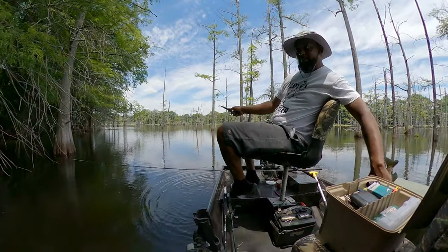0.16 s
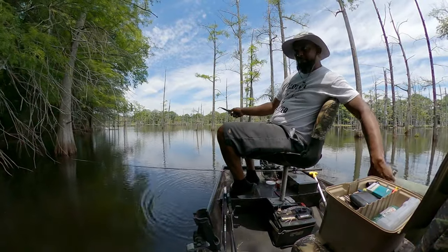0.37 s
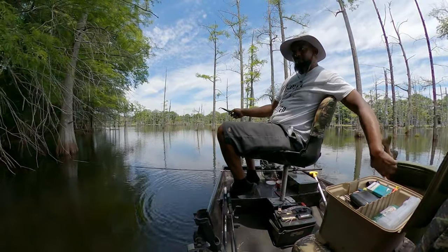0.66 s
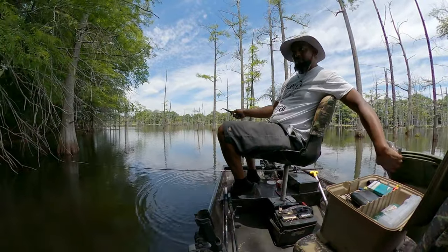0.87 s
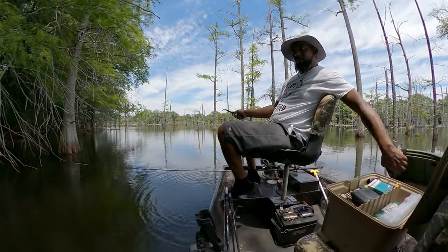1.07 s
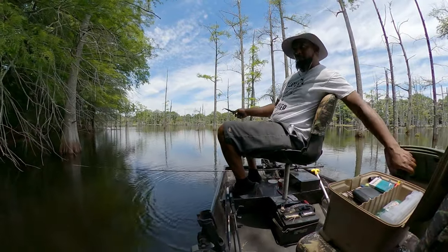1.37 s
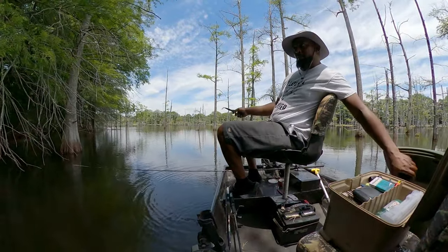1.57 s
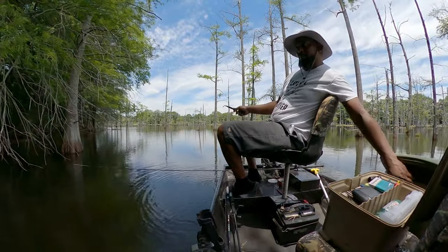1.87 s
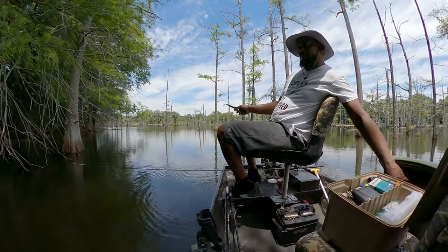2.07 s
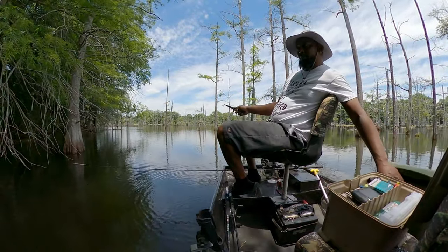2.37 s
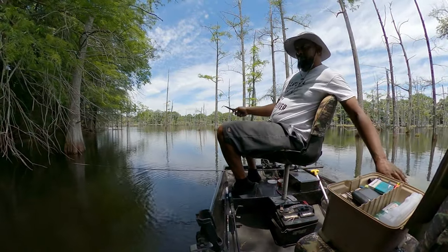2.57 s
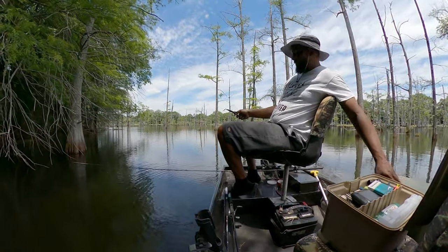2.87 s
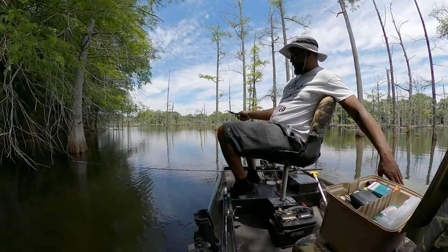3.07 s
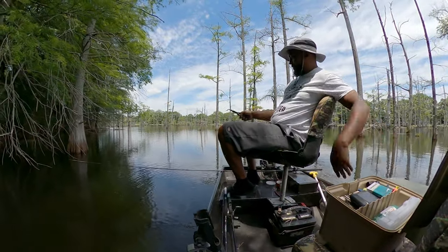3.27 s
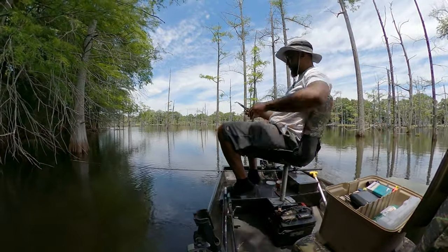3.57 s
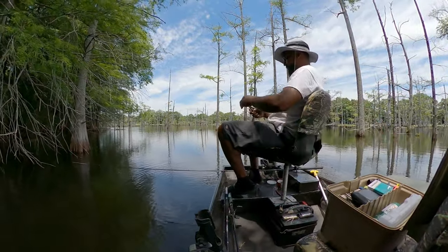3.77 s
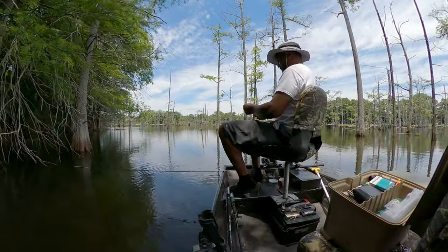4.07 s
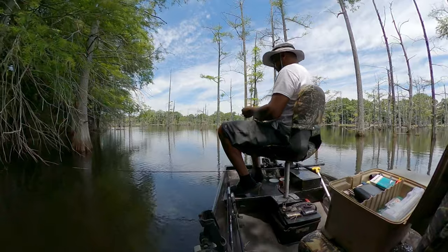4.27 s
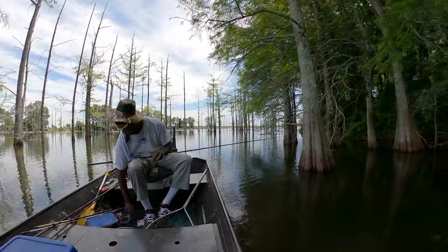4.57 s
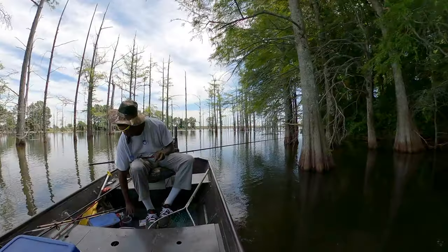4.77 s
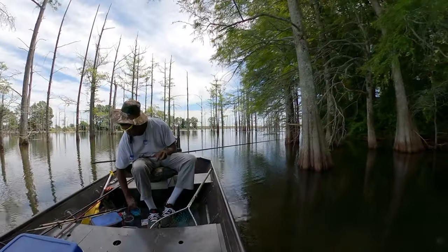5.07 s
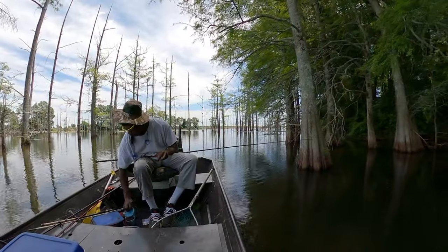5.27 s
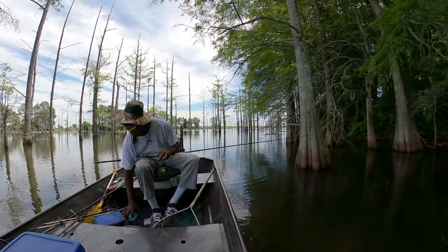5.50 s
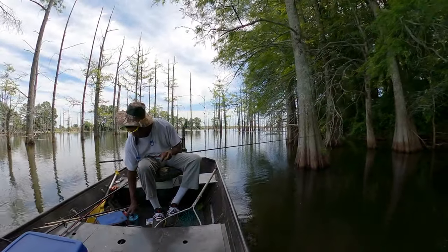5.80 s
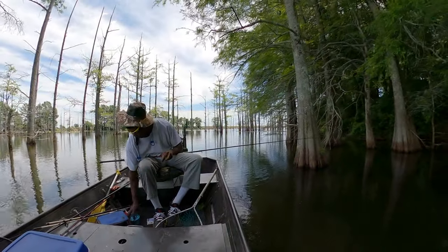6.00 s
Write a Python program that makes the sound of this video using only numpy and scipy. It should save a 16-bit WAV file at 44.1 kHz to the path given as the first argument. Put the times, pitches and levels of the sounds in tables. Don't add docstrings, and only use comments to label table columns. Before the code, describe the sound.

A hull-mounted microphone catches close handling in a small aluminum boat on a still swamp lake. From 0 to 1 s, wind rumble, low hull knocks, light plastic ticks and rustling cloth mix with brief bird whistles and chirps. At about 1.07 and 1.14 s, plastic cracks violently, the second slam overloading and echoing from the trees. A sharp snap follows at 1.6 s, then a hull knock near 2.1 s. From 2.2 to 2.6 s a lid drags and rattles roughly; the box is set down at 2.45 s and drops with a deep boom at 2.65 s. Sparse snaps, cloth and birds continue, with a harder click at 3.4 s. From 4.1 s it fades in steps, cutting at 4.5 s to steady insect hiss and wind puffs. Dull taps come at 5 s, tackle bounces on metal at 5.4 s, a thin swish follows, then fumbling and a final thump.

```python
import sys
import numpy as np
from scipy import signal
from scipy.fft import rfft, irfft
from scipy.io import wavfile
from scipy.ndimage import uniform_filter1d

SR = 44100
rng = np.random.default_rng(int(sys.argv[2]) if len(sys.argv) > 2 else 0)


def pcm_store(signal):
    levels = np.round(np.clip(np.atleast_2d(signal), -1, 1) * 32767)
    wavfile.write(sys.argv[1], SR, levels.astype(np.int16).T)


def elevation(decibels):
    levels = np.asarray(decibels, float)
    return 10 ** (levels / 20)


N = 270774
T = np.arange(N) / SR
FADE_START_S, CUT_S, STEP_S = 4.1043, 4.4713, 1 / 29.97


def colour(x, points):
    hz, db = np.transpose(points)
    f = np.maximum(np.fft.rfftfreq(len(x), 1 / SR), 1)
    return irfft(rfft(x) * elevation(np.interp(np.log(f), np.log(hz), db)), len(x))


def unit(x):
    return x / np.sqrt(np.mean(x ** 2))


def band(x, lo_hz, hi_hz):
    return signal.sosfilt(signal.butter(3, [lo_hz, hi_hz], "band", fs=SR, output="sos"), x)


def split(x, hz):
    low = signal.sosfiltfilt(signal.butter(2, hz, fs=SR, output="sos"), x)
    return low, x - low


def walk(rate_hz):
    k = int(SR / rate_hz)
    steps = np.repeat(rng.standard_normal(N // k + 1), k)
    return unit(uniform_filter1d(steps, k)[:N])


def even(x, size):
    return x / np.sqrt(uniform_filter1d(x ** 2, size))


def add(out, s, x):
    i = int(s * SR)
    out[i:i + len(x)] += x[:N - i]


def decay(t, t60_s):
    return np.exp(-np.log(1000) * t / t60_s)


def rings(hz, db, t60_s, phase, size):
    t = np.arange(size)[:, None] / SR
    return (elevation(db) * decay(t, t60_s) * np.sin(2 * np.pi * (hz * t + phase))).sum(axis=1)


def crack(noise, points, t60_s):
    contact_s = 0.0008
    t = np.arange(len(noise)) / SR
    low, high = split(colour(noise, points), 1800)
    front = (1 + 0.57 * np.exp(-t / 0.0022)) * (1 - np.exp(-t / contact_s))
    return 0.7 * front * (low * decay(t, 1.35 * t60_s) + high * decay(t, 0.84 * t60_s))


def plastic_hit(out, s, db, hz, weight_db, edge_db, t60_s):
    size = 4096
    low_db, high_db = db + weight_db, db + edge_db
    points = [(150, low_db - 9), (400, low_db + 6), (900, low_db), (1300, db + 9), (2700, db - 3),
              (5000, high_db), (7200, high_db - 7), (9000, high_db - 19), (15000, high_db - 57), (17000, -110)]
    add(out, s, crack(rng.standard_normal(size), points, t60_s))
    ring_db = db if hz < 3300 else high_db
    add(out, s, rings(np.array([hz]), ring_db - 11, 0.6 * t60_s, 0, size))
    place, loss, phase = rng.random((3, 5))
    add(out, s, rings(2200 * 3.3 ** place, high_db - 12 - 8 * loss, 0.71 * t60_s, phase, size))


# (time [s], peak [dB], ring [Hz], lows over ring [dB], highs over ring [dB])
LATCH_SNAPS = [(0.0579, -21, 1810, 5.5, 3.5), (0.203, -19, 1920, -28, 0.5), (0.5588, -16.5, 2320, -27, -21),
               (1.0497, -14, 1500, 6, -5), (1.069, 1, 1240, 1, -6.5), (1.0997, -13, 1190, 12, -2),
               (1.1094, -14, 1260, -2, -2.5), (1.1343, -13, 1080, -5, -0.5), (1.141, 9, 1295, -3.5, -0.5),
               (1.575, -2, 1470, -23, -13.5), (1.6093, -23.5, 5580, -32, 20),
               (1.9563, -14.5, 1490, -7, -9.5), (2.0008, -27.5, 5360, 2, 5.5),
               (2.0352, -16.5, 1560, -8, -5.5), (2.4289, -8.5, 2800, 3, 5), (2.556, -12, 1890, -35, -3.5),
               (2.6537, 2, 1570, -5, -6), (3.1914, -17, 1080, 4, -6), (3.4205, -4, 1610, -0.5, -11.5),
               (3.55, -23, 2060, 4, 0), (3.7974, -12, 1230, -9, -13.5), (4.161, -12, 1390, -8, -8),
               (4.687, -19, 1500, 2, -3.5), (5.387, -16.5, 1150, -12, 1.5)]


def snaps():
    ring_s, edge_db_to_double = 0.061, 14
    out = np.zeros(N)
    for s, db, hz, weight_db, edge_db in LATCH_SNAPS:
        t60_s = ring_s * 2 ** (min(edge_db, 2) / edge_db_to_double)
        plastic_hit(out, s, db, hz, weight_db, edge_db, t60_s)
    return out


# (time [s], peak [dB], lows over ring [dB])
BOX_BUMPS = [(0.2924, -25.5, 15.5), (0.3178, -18.5, 6), (0.3798, -36, 22), (0.9729, -22, 8.5),
             (2.0886, -8, 9), (2.2595, -0.5, 6), (2.2879, -2, -3), (2.489, -18, -13), (2.658, -20.5, 26),
             (2.792, -24, 9), (3.228, -23, 5.5), (3.3718, -17.5, 8.5), (3.496, -28, 13.5),
             (5.438, -25.5, -13), (5.468, -30, 16)]


def bumps():
    out = np.zeros(N)
    for s, db, weight_db in BOX_BUMPS:
        plastic_hit(out, s, db, 1230, weight_db, edge_db=-13, t60_s=0.056)
    return out


# (time [s], peak [dB], centre [Hz])
BRIGHT_TICKS = [(0.041, -21, 5344), (0.103, -25, 5540), (0.192, -16, 5400), (0.418, -23, 5140),
                (0.8036, -34, 5810), (0.8932, -24, 6740), (0.96, -22.5, 5900), (1.477, -29.5, 6760),
                (1.63, -19, 5600), (1.853, -24.5, 6140), (1.8813, -24, 5670), (1.928, -26.5, 5670),
                (3.121, -27.5, 4800), (3.3553, -28, 6560), (4.133, -24.5, 6900), (0.293, -24, 6250),
                (1.547, -29, 4550), (1.355, -36, 6960), (3.832, -27, 4940), (2.676, -34, 7050),
                (2.724, -34, 7050), (5.466, -23, 5400), (0.104, -31, 7300)]
# (time [s], peak [dB], centre [Hz])
DULL_TAPS = [(0.937, -18, 1600), (2.049, -27, 450), (2.848, -21, 1740), (3.324, -22, 1900),
             (3.35, -22, 1400), (4.01, -20.5, 1370), (5, -15, 360), (5.043, -17.5, 350), (5.08, -20.5, 440),
             (5.534, -15, 550), (5.595, -18, 710), (5.743, -31, 1370), (5.764, -22, 1300), (5.78, -26, 700),
             (5.795, -27, 1500), (5.856, -20, 1250), (5.862, -16.5, 1400), (5.857, -23.5, 3700),
             (5.883, -18, 520), (5.902, -29, 1000), (5.967, -30, 1260), (6.011, -25, 500),
             (4.034, -28, 1440), (4.047, -28, 1150), (3.405, -32, 3000), (3.46, -20, 2100),
             (1.735, -30, 1340), (0.975, -3, 550), (2.05, -33, 2100), (1.975, -18, 1600),
             (4.128, -26, 2200), (0.297, -11, 1400), (0.29, -17, 1300), (0.38, -22, 970), (4.9, -26, 2000),
             (5.466, -34, 1250), (5.555, -25, 870), (5.512, -32, 1400), (5.984, -18.5, 1204),
             (6.037, -7.5, 360)]


def ticks():
    out = np.zeros(N)
    for s, db, hz in BRIGHT_TICKS + DULL_TAPS:
        points = [(hz / 4, db - 17), (hz / 1.226, db), (hz, db + 9.5),
                  (1.24 * hz, db - 7), (2.27 * hz, db - 35.5), (22000, -110)]
        add(out, s, crack(rng.standard_normal(2048), points, 0.048))
    return out


# (centre [Hz], width [Hz], level [dB])
SLAM_BANDS = [(1080, 25, -4), (1450, 120, -5.5), (1984, 41, -10), (2170, 110, -4), (2415, 58, -5),
              (2740, 50, -5), (2970, 23, -12), (3670, 54, -2.5), (4130, 58, -13), (4670, 32, -19),
              (4950, 130, 1), (6860, 31, -18)]
# (frequency [Hz], level [dB], t60 [s])
BOX_MODES = [(1093, -6, 0.25), (1380, -3, 0.038), (1927, -20, 1.1), (2140, -6, 0.048), (2290, 0, 0.042),
             (2848, -0.5, 0.057), (3260, -5, 0.063), (3970, -3, 0.099), (4160, -1, 0.1), (5400, -15, 0.11),
             (6100, -23, 0.23), (7300, -15, 0.024)]


def slam_echo():
    start_s, level_db, t60_s, widen = 1.142, -21, 0.58, 0.96
    wash_gain, ring_db = 0.97, -11.5
    size = SR // 2
    noise = rng.standard_normal(size)
    body = np.zeros(size)
    for hz, width_hz, db in SLAM_BANDS:
        reach_hz = widen * max(width_hz, 70)
        body += elevation(db) * unit(band(noise, hz - reach_hz, hz + reach_hz))
    wash = unit(band(band(noise, 410, 6100), 300, 7000))
    tail = (unit(body) + wash_gain * wash) * decay(np.arange(size) / SR, t60_s)
    hz, db, mode_t60_s = np.transpose(BOX_MODES)
    ring = rings(hz, db + ring_db, np.minimum(mode_t60_s, 0.12), rng.random(len(hz)), size)
    out = np.zeros(N)
    add(out, start_s, elevation(level_db) * tail + ring)
    return out


# (frequency [Hz], density [dB per Hz])
FRICTION_COLOUR = [(80, -11), (200, 0.5), (300, 0.5), (420, -2), (756, -5), (952, -13), (1140, -3),
                   (1370, -12), (1900, -10.5), (2360, -13.5), (5560, -25.5), (7120, -28.5), (15500, -68.5)]


def slips():
    spikes_db = rng.exponential(size=N // 40 + 1).repeat(40)[:N]
    grains = elevation(1.8 * walk(45) + 2.2 * walk(140) + 1.8 * spikes_db)
    return colour(rng.standard_normal(N) * grains, FRICTION_COLOUR)


# (time [s], length [s], level [dB], brightness [dB], place of peak [0-1])
STROKES = [(0.28, 0.15, -27, -16, 0.12), (0.337, 0.094, -34, -24, 0.6), (1.04, 0.19, -25.5, -12.5, 0),
           (1.969, 0.11, -37, -11.5, 0.12), (2.209, 0.53, -33, -3, 0.11), (2.205, 0.089, -9.5, -6, 0.45),
           (2.287, 0.044, -20.5, -9.5, 0.16), (2.306, 0.052, -14, -9.5, 0.3), (2.348, 0.091, -24, -2, 0.65),
           (2.42, 0.041, -18, -8, 0.72), (2.44, 0.14, -29.5, -0.5, 0.29), (2.549, 0.053, -26.5, -3.5, 0.36),
           (2.589, 0.1, -32, 1, 0.4), (3.358, 0.068, -28, -16, 0.8), (3.415, .07, -33, 3, 0),
           (3.48, 0.28, -34.5, -9, 0), (5.392, 0.14, -38.5, 0, 0), (5.501, 0.13, -36.5, -6, 0.24),
           (5.748, 0.092, -43.5, -3, 0.4), (5.816, 0.16, -38.5, -20, 0.33), (5.934, 0.17, -39, -22, 0.46)]


def scrape():
    dull, bright = (unit(signal.sosfiltfilt(signal.butter(2, 3300, kind, fs=SR, output="sos"), slips()))
                    for kind in ("low", "high"))
    dull_gain, bright_gain = np.zeros(N), np.zeros(N)
    for s, length_s, db, bright_db, peak in STROKES:
        u = np.linspace(0, 1, int(length_s * SR))
        stroke = np.interp(u, [0, np.clip(peak, 0.02, 0.98), 1], [0, 1, 0]) ** 0.75
        add(dull_gain, s, elevation(db) * stroke)
        add(bright_gain, s, elevation(db + bright_db) * stroke)
    thud, middle = split(dull, 900)
    dull = thud + np.roll(middle, N // 2)
    return dull * dull_gain + bright * bright_gain


# (time [s], peak [dB], ring [Hz])
LID_CATCHES = [(2.2063, -43, 1140), (2.2168, -18, 3280), (2.2227, -3, 1900), (2.237, -8, 2400),
               (2.251, -16, 1500), (2.314, -3, 1740), (2.3355, -2.5, 1870), (2.337, -12, 3620),
               (2.379, -21, 7000), (2.3869, -11, 1860), (2.394, -10, 2000), (2.398, -17, 4000),
               (2.4333, -11, 4570), (2.44, -10, 560), (2.4857, -13, 1740), (2.49, -20, 600),
               (2.662, -16, 580), (2.506, -27, 3420), (2.573, -12, 2000), (2.6064, -24, 4090),
               (2.621, -20, 5500)]


def catches():
    out = np.zeros(N)
    for s, db, hz in LID_CATCHES:
        points = [(hz / 4, db - 28), (hz / 1.08, db - 1), (hz, db + 12), (1.2 * hz, db),
                  (7400, db - 9), (15000, db - 49), (22000, -110)]
        add(out, s, crack(rng.standard_normal(2048), points, 0.045))
    return out


# (time [s], peak [dB], ring [Hz], t60 [s])
BOX_DROPS = [
    (2.4449, 0, 222.2, 0.15),
    (2.655, -1.5, 172.5, 0.33),
    (2.6574, -8.5, 281, 0.17),
]


def drops():
    out = np.zeros(N)
    rise_s = 0.0035
    rise = np.clip(np.arange(16000) / SR / rise_s, 0, 1)
    for s, db, hz, t60_s in BOX_DROPS:
        add(out, s, rise * rings(np.array([hz]), db, t60_s, 0, len(rise)))
    return out


# (frequency [Hz], level [dB], t60 [s])
TRAY_MODES = [(497, -8.5, 0.37), (566, -3, 0.11), (792, -8, 0.17), (1150, -10, 0.087), (1720, -12, 0.074),
              (2297, -7.5, 0.044)]
# (time [s], level [dB])
TACKLE_BLOWS = [
    (5.387, -22.5),
    (5.417, -25.5),
    (5.439, -25.5),
    (5.468, -49),
]


def tray():
    out = np.zeros(N)
    hz, db, t60_s = np.transpose(TRAY_MODES)
    for s, blow_db in TACKLE_BLOWS:
        detune, uneven = rng.standard_normal((2, len(hz)))
        add(out, s, rings(hz * (1 + 0.014 * detune), db + blow_db + 2.3 * uneven, t60_s, 0, 16000))
    return out


# (time [s], peak [dB], main ring [Hz], deep jolt [dB])
HULL_KNOCKS = [(0.296, -3, 128.3, -3.5), (0.323, -5, 134.4, -7.5), (0.358, -8, 158, -14),
               (0.786, -9, 163, -18), (0.859, -11, 166.3, -13.5), (0.969, -4.5, 165.7, -14),
               (1.006, -17, 173, -27), (1.057, -12.5, 148.3, -34), (1.096, -10, 166.6, -15.5),
               (1.146, -7.5, 130, -37), (1.795, -15.5, 178, -21), (2.089, -2.5, 184.7, -34),
               (2.088, -5.5, 293.4, -41), (2.238, -16, 297, -33), (2.326, -20, 236, -36),
               (2.372, -16.5, 242, -39), (2.441, -17.5, 242, -17.5), (2.485, -17.5, 243, -30),
               (2.542, -13, 255, -46), (2.575, -14.5, 246, -41), (2.653, -12, 301, -3.5),
               (2.69, -12.5, 167, -23), (2.72, -18.5, 151, -19), (2.808, -15, 146.5, -11),
               (2.993, -20, 170.6, -37), (3.368, -21, 184, -23), (3.498, -13.5, 173, -29),
               (3.633, -13, 167, -39), (3.818, -18.5, 191.6, -37), (4.436, -46.5, 159, -20.5),
               (5.389, -18, 237, -53)]
# (frequency [Hz], level [dB], share of t60 [1])
HULL_MODES = [(178, -1, 1), (225.1, -5.5, 0.89), (281.3, -8.5, 1), (324.2, -12, 0.76), (394.5, -19.5, 0.93),
              (475, -18, 0.43), (569, -24, 0.68), (672, -29, 0.38)]
PUSH_S = 0.0241


def knocks():
    t60_s, release_s, free_share = 0.49, 0.0029, 0.23
    out = np.zeros(N)
    hz, db, share = np.transpose(HULL_MODES)
    t = np.arange(16000) / SR
    swell = np.clip(t / PUSH_S, 0, 1) ** 0.83
    held = np.exp(-np.maximum(t - PUSH_S, 0) / release_s)
    push = swell * (free_share + (1 - free_share) * held)
    for s, peak_db, main_hz, jolt_db in HULL_KNOCKS:
        detune, uneven, phase = rng.standard_normal((3, len(hz)))
        body = rings(hz * (1 + 0.04 * detune), db - 4 + 3 * uneven, t60_s * share, phase, len(t))
        body += rings(np.array([main_hz]), 0, 0.76 * t60_s, 0, len(t))
        body *= push
        jolt = rings(np.array([66, 88]), jolt_db - 3, 0.21, phase[:2] / 8, len(t))
        jolt *= np.clip(t / 0.005, 0, 1)
        add(out, s - 0.004, body / np.abs(body).max() * elevation(peak_db) + jolt)
    return out


def after(times_s, db, t60_s):
    coarse = T[::64]
    late = np.maximum(coarse[:, None] - times_s, 0)
    power = elevation(2 * db) * (1 - np.exp(-late / PUSH_S)) * decay(late, t60_s) ** 2
    return np.interp(T, coarse, power.sum(axis=1))


def swells(table):
    return sum(elevation(2 * db) * np.sin(np.pi * np.clip((T - s) / length_s, 0, 1)) ** 2
               for s, length_s, db in table)


# (time [s], length [s], level [dB])
WEIGHT_SHIFTS = [
    (-.1, 0.5, -32.5),
    (.45, 0.51, -28.5),
    (3.35, 0.36, -31.5),
    (4.574, 0.23, -34),
    (5.0, 0.39, -41.5),
    (5.45, 0.29, -34.5),
]
# (time [s], length [s], level [dB])
WIND_GUSTS = [
    (-.12, 0.21, -20.5),
    (.15, 0.51, -24.5),
    (.7, 0.24, -23),
    (1.4, 0.36, -42),
    (1.95, 0.55, -29),
    (2.55, 0.23, -24),
    (2.65, 1.92, -28.5),
    (4.15, 0.32, -22),
    (4.57, 0.37, -22.5),
]


def rocking():
    calm_db, sway_rest_db = -49, -49
    murmur_rest_db, murmur_far_db, murmur_in_lurch_db = -40.5, -49, -8.5
    gust = colour(rng.standard_normal(N), [(10, -42), (24, 7), (36, -6), (60, -9), (200, -76), (20000, -120)])
    sway = colour(rng.standard_normal(N), [(30, -29.5), (58, 10), (75, -5), (125, 0), (300, -35.5),
                                           (20000, -120)])
    hz, db, share = np.transpose(HULL_MODES)
    shocks = rng.standard_normal(N) * elevation(5.8 * walk(25))
    hull = signal.fftconvolve(shocks, rings(hz, db, 0.16 * share, 0, 8000))[:N]

    lurch = swells(WEIGHT_SHIFTS)
    s, peak_db, _, jolt_db = np.transpose(HULL_KNOCKS)
    blowing = elevation(2 * calm_db) + swells(WIND_GUSTS)
    swaying = elevation(2 * sway_rest_db) + lurch + after(s, jolt_db - 11.5, t60_s=0.57)
    rest_db = np.interp(T, [(FADE_START_S + CUT_S) / 2, CUT_S], [murmur_rest_db, murmur_far_db])
    murmur = elevation(2 * rest_db) + lurch * elevation(2 * murmur_in_lurch_db) + after(s, peak_db - 19, t60_s=0.67)
    return (even(gust, 5000) * np.sqrt(blowing) + even(sway, 5000) * np.sqrt(swaying)
            + even(hull, 9000) * np.sqrt(murmur))


# (frequency [Hz], density [dB per Hz])
LINE_COLOUR = [(3000, -13), (5500, 3), (7000, 3), (9500, -8.5), (14500, -34), (16000, -62)]


def swish():
    start_s, length_s, level_db = 5.533, 0.047, -33
    out = np.zeros(N)
    u = np.linspace(0, 1, int(length_s * SR))
    whip = unit(colour(rng.standard_normal(len(u)), LINE_COLOUR))
    add(out, start_s, elevation(level_db) * whip * u ** 0.5 * (1 - u ** 8))
    return out


# (time [s], level [dB])
CLOTH_MOVES = [
    [(0.0, -35), (0.352, -41), (0.836, -38), (1.12, -41)],
    [(1.42, -47), (1.874, -48), (2.19, -64)],
    [(2.68, -51), (3.02, -67), (3.112, -44), (3.484, -38.5), (3.996, -40.5), (4.4, -52)],
]
# (frequency [Hz], density [dB per Hz])
CLOTH_COLOUR = [(250, -11), (450, -2), (850, -8), (1320, -1), (2240, -6.5), (3690, -3), (7240, -10.5),
                (8500, -21.5), (14000, -51.5)]


def rustle():
    gain = sum(elevation(np.interp(T, *np.transpose(rows), -200, -200)) for rows in CLOTH_MOVES)
    waver = elevation(1.6 * walk(30))
    return unit(colour(rng.standard_normal(N) * waver, CLOTH_COLOUR)) * gain * elevation(-2.5)


# (time [s], length [s], start [Hz], end [Hz], level [dB])
BIRD_WHISTLES = [(0.023, 0.0293, 2730, 3380, -36), (0.347, 0.025, 5230, 5240, -36),
                 (.342, 0.018, 6310, 6310, -41), (0.47, 0.19, 5270, 5250, -48),
                 (0.587, 0.06, 2560, 2740, -37), (0.818, 0.052, 5970, 5080, -42),
                 (1.653, 0.03, 5900, 5980, -48), (3.585, 0.048, 5540, 4080, -40),
                 (3.628, 0.044, 4080, 3740, -39), (3.665, .032, 3760, 3500, -37),
                 (3.861, 0.036, 5650, 4600, -37), (3.908, .069, 4100, 3400, -39),
                 (0.64, 0.14, 2670, 2600, -47), (4.212, 0.03, 5500, 4600, -46),
                 (4.203, .025, 5100, 4350, -48), (4.18, .08, 3850, 4300, -49), (4.29, .06, 5150, 5850, -53),
                 (4.705, 0.083, 2440, 2435, -53), (4.875, 0.13, 2366, 2250, -53),
                 (5.646, 0.17, 2340, 2160, -51), (1.86, .05, 5800, 5750, -49),
                 (2.05, .045, 6000, 7300, -51), (2.015, .03, 5000, 5050, -50), (2.68, .06, 5800, 5750, -54)]
# (time [s], length [s], start [Hz], end [Hz], level [dB])
BIRD_CHIRPS = [
    (0.311, 0.034, 6000, 4190, -39),
    (0.409, 0.036, 7800, 4200, -38),
    (0.448, .028, 5050, 5300, -35),
    (0.52, .028, 4900, 3450, -45),
    (0.552, 0.03, 2950, 3120, -38),
    (0.748, 0.027, 5200, 5700, -49),
    (2.04, 0.05, 6400, 5750, -43),
]


def birds():
    out = np.zeros(N)
    flutter_db = 1.4 * walk(60)
    for table, bend in ((BIRD_WHISTLES, 0.4), (BIRD_CHIRPS, 3.0)):
        for s, length_s, start_hz, end_hz, db in table:
            u = np.linspace(0, 1, int(length_s * SR))
            hz = start_hz + (end_hz - start_hz) * np.expm1(-bend * u) / np.expm1(-bend)
            level = elevation(db + flutter_db[int(s * SR):][:len(u)])
            swell = np.sqrt(np.abs(np.sin(np.pi * u)))
            add(out, s, level * swell * np.sin(2 * np.pi * np.cumsum(hz) / SR))
    return out


def trees(x):
    t60_s, top_hz = 0.42, 7100
    t = np.arange(SR) / SR
    tail = band(band(rng.standard_normal(len(t)), 730, top_hz), 20, top_hz)
    tail *= decay(t, t60_s) * (1 - np.exp(-t / 0.0014))
    tail /= np.sqrt(np.sum(tail ** 2))
    return signal.fftconvolve(x, tail)[:N] * elevation(2.5 * walk(35))


# (frequency [Hz], density [dB per Hz])
AIR_COLOUR = [(250, -31.5), (420, -19), (900, -13), (1150, -2.5), (2300, -11), (4800, -9), (6500, -9.5),
              (8000, -19), (15000, -54)]
# (frequency [Hz], density [dB per Hz])
CHORUS_COLOUR = [(200, -11), (330, -16.5), (450, -22), (913, -22), (1310, -16), (2700, -18.5), (3490, -9),
                 (4250, -3.5), (4900, -13.5), (7600, -16), (8600, -23.5), (9600, -35), (11500, -34.5),
                 (15000, -60)]


def hiss(points, db, flicker_db):
    low, high = split(unit(colour(rng.standard_normal(N), points)), 2800)
    return elevation(db) * (low * elevation(flicker_db * walk(2.51)) + high * elevation(flicker_db * walk(7.8)))


def fade(t):
    return np.clip((CUT_S + STEP_S - t) / (CUT_S - FADE_START_S), 0, 1) ** 0.95


def scene():
    hits = band(snaps() + bumps() + ticks(), 40, 13000)
    song = birds()
    echo = trees(elevation(-30) * hits + elevation(-11) * song)
    box = hits + slam_echo() + scrape() + catches() + drops() + tray()
    near = box + knocks() + rocking() + swish() + rustle() + song + echo
    held_s = FADE_START_S + np.floor((T - FADE_START_S) / STEP_S) * STEP_S
    stepped = fade(held_s + STEP_S / 2)
    first = near * stepped / np.maximum(fade(T), 1e-3) + hiss(AIR_COLOUR, -48.5, 2.0) * stepped
    rise_s = 0.016
    second = (near + hiss(CHORUS_COLOUR, -42.5, 0.2)) * np.clip((T - CUT_S) / rise_s, 0, 1)
    return np.where(T < CUT_S, first, second)[None]


def band_limit(x):
    return signal.sosfilt(signal.butter(12, 15620, fs=SR, output="sos"), x)


def record(dry):
    mix = np.clip(dry, -1, 1)
    return band_limit(mix)


dry = scene()
out = record(dry)
pcm_store(out)
```